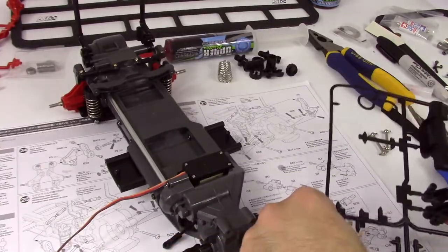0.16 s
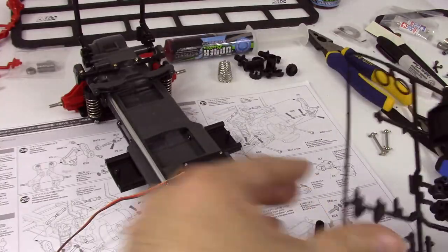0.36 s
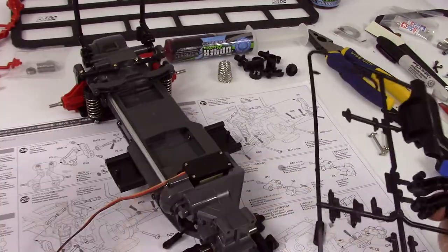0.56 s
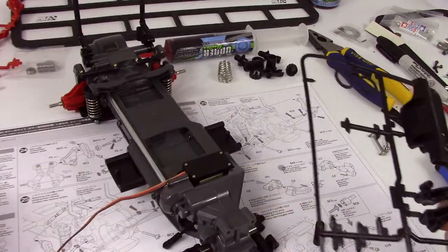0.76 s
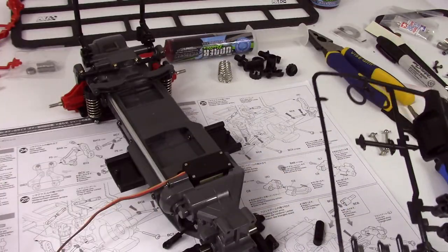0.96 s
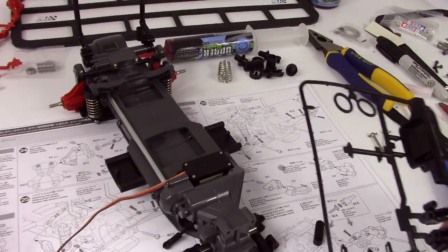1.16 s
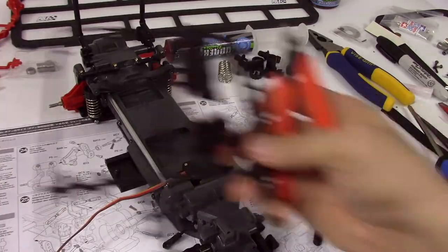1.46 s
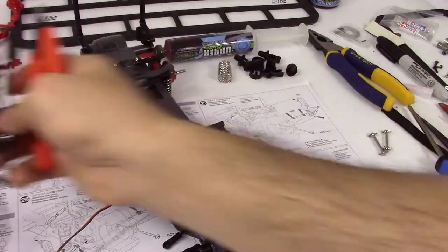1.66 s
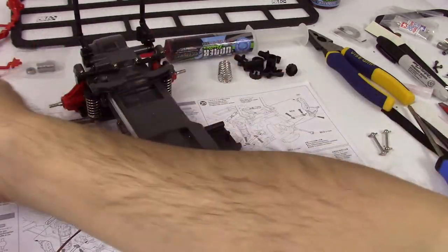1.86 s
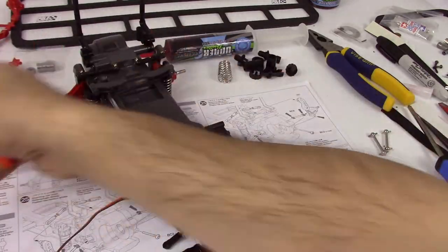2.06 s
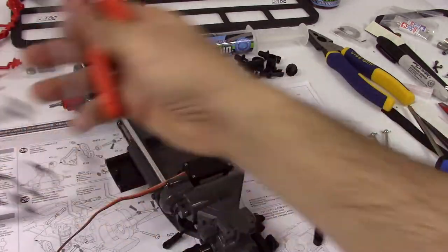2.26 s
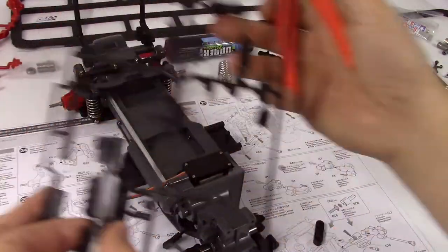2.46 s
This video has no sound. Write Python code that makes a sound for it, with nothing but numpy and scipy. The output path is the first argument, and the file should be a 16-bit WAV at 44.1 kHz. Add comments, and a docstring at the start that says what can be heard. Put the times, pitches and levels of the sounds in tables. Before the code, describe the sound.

Close, muffled shirt rustle with sharp little plastic clicks, a brief quieter moment, then strong low thumps and louder rubbing, a short rattling drop of thin plastic, and more cloth rustle in a quiet room with faint hiss.

```python
"""At a hobby table, a clip-on microphone rubs on the shirt of its wearer, who reaches across.
Cloth rustles as three bands of patchy noise; rounded pushes and slipping tugs move the capsule.
Thin plastic sprues tick as short rings, scrape as dense grains, squeak as gliding tones and knock as ringing modes.
One frame is dropped on a pile of others and rattles out; the room answers under a steady faint hiss."""
import sys
import numpy as np
from scipy import signal
from scipy.fft import rfft, irfft, next_fast_len
from scipy.io import wavfile
from scipy.ndimage import uniform_filter1d, map_coordinates

SR = 44100
rng = np.random.default_rng(int(sys.argv[2]) if len(sys.argv) > 2 else 0)


def elevation(decibels):
    """Turn decibel levels (scalar or array-like) into linear amplitude ratios."""
    levels = np.asarray(decibels, float)
    return 10 ** (levels / 20)


def file_out(sig):
    """Save sig as 16-bit WAV at sys.argv[1]."""
    # one column per channel
    cols = np.atleast_2d(sig).T
    # limit, then scale
    lim = np.clip(cols, -1, 1)
    pcm = np.round(lim * 32767).astype(np.int16)
    wavfile.write(sys.argv[1], SR, pcm)


N = 114660  # length in samples


def unit(x):
    """Scales a sound to rms 1."""
    return x / np.sqrt(np.mean(x ** 2) + 1e-20)


def along(points, hz):
    """Reads a curve of (Hz, value) points on a log frequency axis."""
    point_hz, value = np.transpose(points)
    return np.interp(np.log(hz + 1), np.log(point_hz + 1), value)


def wobble(rate):
    """A smooth random curve through rate knots a second."""
    knots = rng.standard_normal(int(N * rate / SR) + 4)
    return map_coordinates(knots, [np.arange(N) * rate / SR])


def filtered(x, response):
    """Shapes the spectrum of x by a function of frequency."""
    size = next_fast_len(len(x) + 8192)
    hz = np.fft.rfftfreq(size, 1 / SR)
    return irfft(rfft(x, size) * response(hz), size)[:len(x)]


def add(track, start_s, sound):
    """Mixes a sound into the track from start_s, cut at the track's end."""
    part = track[round(start_s * SR):][:len(sound)]
    part += sound[:len(part)]


# steady hiss of room and microphone, spectrum shape: pitch_hz [Hz], density_db [dB per Hz]
FLOOR_SPECTRUM = [(100, -9), (1000, 20), (4000, -4), (9000, -4), (13000, -26), (16000, -1)]
FLOOR_DB = -70.5  # rms


def noise_floor():
    """Steady noise coloured by one fixed spectrum."""
    noise = rng.standard_normal(N)
    return elevation(FLOOR_DB) * unit(filtered(noise, lambda hz: elevation(along(FLOOR_SPECTRUM, hz))))


# how long the room rings at each pitch: pitch_hz [Hz], t60_s [s]
ROOM_DECAY = [(200, 0.21), (2000, 0.16), (10000, 0.18)]
ROOM_DB = -12


def room(x):
    """The room's answer is a burst of noise in which each frequency dies at its own speed."""
    hz, t, z = signal.stft(rng.standard_normal(SR // 2), SR, nperseg=256)
    decay = elevation(-60 * t / along(ROOM_DECAY, hz)[:, None])
    tail = signal.istft(z * decay, SR, nperseg=256)[1]
    late = np.pad(x, (200, 0))  # the answer starts 200 samples after the sound
    return elevation(ROOM_DB) * signal.fftconvolve(late, tail / np.linalg.norm(tail))[:N]


def rush(spectrum, patchy_db, grain_db, grain_rate):
    """Coloured noise of rms 1, mottled in time and pitch, with a fine grain in its level."""
    z = signal.stft(rng.standard_normal(N), nperseg=512)[2]
    patches = uniform_filter1d(rng.standard_normal(z.shape), 8, 0)
    patches = uniform_filter1d(patches, 8, 1)
    noise = signal.istft(z * elevation(patchy_db * unit(patches)), nperseg=512)[1][:N]
    grainy = noise * elevation(grain_db * wobble(grain_rate))
    return unit(filtered(grainy, lambda hz: elevation(along(spectrum, hz))))


# spectrum shapes of the three cloth layers: pitch_hz [Hz], density_db [dB per Hz]
RUMBLE_SPECTRUM = [(4, -16), (11, 8.5), (22, -2.5), (38, 0.5), (55, -8), (85, -18), (130, -25), (250, -46)]
RUB_SPECTRUM = [(60, 3), (120, 1.5), (250, -1), (500, 1), (800, -4), (1300, -6), (2000, -14.5), (3000, -23),
                (5000, -37)]
HISS_SPECTRUM = [(1000, -10), (2000, -4), (2800, -2.5), (3800, 3), (5000, -3), (6500, -3.5), (8500, -6),
                 (11000, -11.5), (13500, -45), (16000, -12)]
# cloth moving on the microphone, levels glide between rows:
# time_s [s], rumble_db [dB], rub_db [dB], hiss_db [dB]
CLOTH_MOVES = [(0, -38.5, -39.5, -46.5), (.1, -43, -44.5, -46), (.145, -37.5, -49, -59.5),
               (.2, -34, -40.5, -50), (.27, -48.5, -39, -47), (.35, -37.5, -44, -52.5),
               (.46, -40, -50.5, -49.5), (.52, -35, -42, -48.5), (.6, -37.5, -37.5, -46),
               (.72, -39.5, -37, -48), (.85, -43.5, -37, -50.5), (.91, -38, -42.5, -54.5),
               (.99, -44, -53, -59.5), (1.09, -46, -51, -57), (1.27, -44.5, -47, -57),
               (1.34, -44, -42, -51), (1.44, -46, -35.5, -47.5), (1.55, -35, -35, -42),
               (1.67, -25.5, -32, -40), (1.73, -30, -32, -40.5), (1.78, -34, -37.5, -42.5),
               (1.88, -37, -35, -44.5), (1.93, -41, -42.5, -54), (2.11, -33.5, -36, -45.5),
               (2.25, -40.5, -35, -46.5), (2.42, -38.5, -38, -49), (2.6, -45, -35, -48.5)]


def cloth():
    """Fabric dragging on the microphone: rumble, rub and hiss; one flutter ties rub and hiss together."""
    time_s, *levels = np.transpose(CLOTH_MOVES)
    rumble_db, rub_db, hiss_db = [np.interp(np.arange(N) / SR, time_s, level) for level in levels]
    flutter = wobble(35.274)
    rumble = rush(RUMBLE_SPECTRUM, patchy_db=-0.3, grain_db=1.4, grain_rate=29)
    rub = rush(RUB_SPECTRUM, patchy_db=0.52, grain_db=-0.5, grain_rate=260)
    hiss = rush(HISS_SPECTRUM, patchy_db=0.56, grain_db=0.5, grain_rate=400)
    return (elevation(rumble_db + 0.5 * wobble(10.57)) * rumble
            + elevation(rub_db + 1.56 * flutter) * rub
            + elevation(hiss_db + 0.32 * flutter) * hiss)


# soft bumps on the capsule: peak_s [s], level_db [dB], pitch_hz [Hz], direction [signed gain]
CAPSULE_BUMPS = [(0.1762, -29.5, 410, 1), (0.2772, -17.5, 152, -0.85), (.298, -43, 92, 0.88),
                 (0.3101, -27.5, 250, 0.83), (0.344, -21.5, 182, -0.92), (0.698, -24, 9.3, 0.65),
                 (0.838, -36, 20, 0.64), (.895, -34.5, 52, 1), (1.190, -28.5, 240, -0.67),
                 (1.244, -25.5, 270, 0.5), (1.415, -18, 34, 0.84), (1.4898, -15, 360, -0.83),
                 (1.5812, -19, 400, -0.88), (1.606, -23, 48, -0.91), (1.639, -21, 82, 1),
                 (1.650, -18, 36, -0.65), (1.6637, -10.5, 155, -0.75), (1.682, -11, 48, 0.49),
                 (1.714, -16, 23, -0.38), (1.761, -29, 92, 0.76), (1.778, -30, 165, -1.5),
                 (2.2888, -19.5, 430, -0.81), (2.302, -44, 360, -1)]
EDGE_RATIO, EDGE_DB = 2.07, -12.5  # sharper tip of a bump: pitch ratio, level against the push


def bumps():
    """Each bump is one rounded push with a dip on either side and a smaller, sharper tip."""
    out, t = np.zeros(N), np.arange(-SR // 20, SR // 8) / SR
    for peak_s, level_db, pitch_hz, direction in CAPSULE_BUMPS:
        for ratio, gain_db in (1, level_db), (EDGE_RATIO, level_db + EDGE_DB):
            u = (np.pi * pitch_hz * ratio * t) ** 2
            add(out, peak_s + t[0], direction * elevation(gain_db) * (1 - 2 * u) * np.exp(-u))
    return out


# tugs of the cloth on the capsule: slip_s [s], level_db [dB], swing_hz [Hz]
CAPSULE_TUGS = [(1.4877, -15, 19), (1.5851, -15, 31), (2.2863, -18.5, 24)]
TIGHTEN_S, SLIP_S, SWING_T60_S = 0.0019, 0.00081, 0.143


def tugs():
    """Cloth tightens and pulls the capsule one way, then slips; the capsule swings back and settles."""
    out, t = np.zeros(N), np.arange(-SR // 20, SR // 8) / SR
    slipped = (1 + np.tanh(t / SLIP_S)) / 2  # 0 while held, 1 once free
    pull = (1 - slipped) * np.exp(-np.abs(t) / TIGHTEN_S)
    for slip_s, level_db, swing_hz in CAPSULE_TUGS:
        swing = np.cos(2 * np.pi * swing_hz * t) * elevation(-60 * np.abs(t) / SWING_T60_S)
        add(out, slip_s + t[0], elevation(level_db) * (slipped * swing - pull))
    return out


# dry ticks of thin plastic: start_s [s], level_db [dB], pitch_hz [Hz]
PLASTIC_TICKS = [(.153, -33, 9900), (.158, -52, 9000), (.1675, -41, 11550), (0.1736, -33.5, 4560),
                 (0.1748, -32, 10300), (.180, -35, 11000), (.413, -26.5, 8100), (.587, -30, 8800),
                 (.665, -29, 12100), (.682, -15, 8100), (.892, -39, 10000), (.915, -38, 8000),
                 (0.9197, -27, 8300), (0.9217, -20.5, 10500), (0.9247, -20, 8300), (.9247, -24, 11000),
                 (0.9467, -27, 7600), (.966, -40, 10000), (.969, -43, 12000), (.985, -41, 5200),
                 (1.026, -31.5, 10000), (1.1703, -34, 6560), (1.6142, -17.5, 7800)]
TICK_CYCLES, TICK_RISE_CYCLES = 6.5, 1.5  # cycles to fall by 30 dB, cycles of rise
OVERTONE_RATIO, OVERTONE_DB = 1.4, -9
FIZZ_DB, FIZZ_T60_S = -28, 0.025


def ticks():
    """Thin plastic rings for a few cycles with an overtone, over a faint dying fizz."""
    out, t = np.zeros(N), np.arange(SR // 50) / SR
    for start_s, level_db, pitch_hz in PLASTIC_TICKS:
        noise = np.diff(rng.standard_normal(len(t) + 2), 2) / 2  # differencing favours the treble
        fizz = elevation(FIZZ_DB - 60 * t / FIZZ_T60_S) * noise
        rise = 1 - np.exp(-(t * pitch_hz / TICK_RISE_CYCLES) ** 2)
        life = elevation(-30 * t * pitch_hz / TICK_CYCLES) * rise
        ring = np.sin(2 * np.pi * pitch_hz * t)
        overtone = np.sin(2 * np.pi * pitch_hz * OVERTONE_RATIO * t + rng.uniform(0, 8.3))
        ring = ring + elevation(OVERTONE_DB) * overtone
        add(out, start_s, elevation(level_db) * (ring * life / life.max() + fizz))
    return out


# short squeaks of plastic: start_s [s], length_s [s], level_db [dB], pitch_hz [Hz] at the start
PLASTIC_SQUEAKS = [(.283, 0.0079, -41, 5440), (.862, .012, -36, 3950), (1.104, .022, -46.5, 6570),
                   (1.8, .013, -37, 8600), (1.132, 0.02, -54, 6400), (1.3, 0.028, -65, 6200),
                   (1.176, 0.015, -55, 5500)]


def squeaks():
    """A thin tone swells and fades while its pitch glides up a little and jitters."""
    out, t = np.zeros(N), np.arange(SR // 8) / SR
    for start_s, length_s, level_db, pitch_hz in PLASTIC_SQUEAKS:
        u = np.clip(t / length_s, 0, 1)
        jitter = np.cumsum(0.12 * rng.standard_normal(len(t)))  # radians
        tone = np.sin(2 * np.pi * pitch_hz * t * (1 + 0.022 * u) + jitter)
        add(out, start_s, elevation(level_db) * np.sin(np.pi * u) * tone)
    return out


def tilt_db(hz, slope):
    """Brightness pivoting at 2 kHz in dB per octave of (hz + 700), with plastic dulling above 12.4 kHz."""
    return slope * np.log2((hz + 700) / 2700) - 10 * np.log10(1 + (hz / 12400) ** 4)


# ringing modes of a sprue frame: pitch_hz [Hz], level_db [dB], t60_s [s]; knocks play them too
FRAME_MODES = [(406, -4.5, 0.071), (590, -2, 0.042), (678, -2.5, 0.047), (785, 0.5, 0.043),
               (857, -8.5, 0.056), (1000, -5, 0.041), (1180, -1.5, 0.024), (1400, -7.5, 0.037),
               (1590, -8, 0.013), (1987, -2, 0.055), (2720, -11, 0.047), (2942, -5, 0.052),
               (3535, -4, 0.04), (3837, 2, 0.021), (4090, 0, 0.02), (5250, -5.5, 0.034), (6010, -9, 0.054),
               (6920, -6.5, 0.091), (8300, -10.5, 0.059), (11000, -12, 0.018)]
SCRAPE_WIDEN = 13  # modes are this much broader while frames rub


def rubbed_frame(hz):
    """Response of a frame held in contact: its modes as heavily damped resonances of alternating sign."""
    total = 0
    for k, (mode_hz, level_db, t60_s) in enumerate(FRAME_MODES):
        damping = 1j * hz * SCRAPE_WIDEN * 2 / t60_s
        total = total + elevation(level_db) * damping / (mode_hz * mode_hz - hz * hz + damping) * (-1) ** k
    return total


# frames sliding on each other: start_s [s], length_s [s], level_db [dB], slope [dB per octave]
FRAME_SCRAPES = [(0.222, 0.059, -50.5, 8), (0.28, 0.017, -47, 3), (0.852, 0.024, -44, -1.5),
                 (1.05, 0.017, -47.5, -3.5), (1.106, 0.023, -52, 1), (1.167, 0.03, -47, 3),
                 (1.9489, 0.055, -26, 0), (1.981, 0.027, -30, 0), (2.007, 0.0706, -38, -3.5),
                 (2.057, 0.011, -40, 4)]
SCRAPE_RISE_S, SCRAPE_FALL_S = 0.00084, 0.0057
GRAINS_PER_S, GRAIN_SPREAD_DB = 4600, 3


def scrapes():
    """Sliding edges catch in dense uneven grains that excite the blurred modes of the frame."""
    out, t = np.zeros(N), np.arange(SR // 8) / SR
    for start_s, length_s, level_db, slope in FRAME_SCRAPES:
        chance, strength = rng.random((2, len(t)))
        hits = chance < GRAINS_PER_S / SR
        grains = hits * elevation(GRAIN_SPREAD_DB * strength) * rng.choice([-1, 1], len(t))
        fall = np.exp(-np.maximum(t - length_s, 0) / SCRAPE_FALL_S)
        stroke = (1 - np.exp(-t / SCRAPE_RISE_S)) * fall
        # a little of each grain passes without the modes
        rasp = unit(filtered(grains, lambda hz: (rubbed_frame(hz) + 0.1) * elevation(tilt_db(hz, slope))))
        add(out, start_s, elevation(level_db) * stroke * rasp)
    return out


# knocks on a frame, with the drop and its rattle: start_s [s], level_db [dB], favoured_hz [Hz]
FRAME_KNOCKS = [(.153, -44.5, 3570), (.1745, -43.5, 2600), (.1795, -38, 3250), (0.255, -42, 1300),
                (.966, -47, 4800), (1.0525, -38, 3870), (1.056, -45, 1800), (1.1268, -33, 1050),
                (1.130, -37.5, 1400), (1.135, -38, 1000), (1.1706, -45.5, 2200), (1.189, -37, 447),
                (1.949, -25, 10500), (1.954, -25.5, 4540), (1.960, -28, 3900), (1.972, -25, 2800),
                (1.9783, -15.5, 3700), (1.9812, -19.5, 800), (1.9835, -23, 2480), (1.9915, -23, 700),
                (1.991, -30, 5500), (1.996, -33, 3000), (2.002, -22.5, 600), (2.010, -30, 3500),
                (2.014, -22.5, 430), (2.021, -41, 5000), (2.045, -36, 3500), (2.060, -39, 9000),
                (2.064, -32.5, 3680)]
FAVOUR_OCTAVES, FAVOUR_DB = 0.57, 16  # width of the favoured range, its height over the rest
CRACK_DB, CRACK_T60_S = 2.5, 0.036


def knocks():
    """Each knock rings the frame's modes anew, most near the pitch it favours, with a noisy crack."""
    out, t = np.zeros(N), np.arange(SR // 8) / SR
    for start_s, level_db, favoured_hz in FRAME_KNOCKS:
        def favour_db(hz):
            """Level against pitch: a hump at the favoured pitch."""
            octaves = np.log2((hz + 1) / favoured_hz)
            return FAVOUR_DB * (np.exp(-(octaves / FAVOUR_OCTAVES) ** 2) - 1) + tilt_db(hz, 0)

        ring = np.zeros(len(t))
        for mode_hz, mode_db, t60_s in FRAME_MODES:
            struck_db = mode_db + favour_db(mode_hz) + rng.normal(0, 4.9)
            struck_hz = mode_hz * rng.normal(1, 0.0064)
            tone = np.sin(2 * np.pi * struck_hz * t + rng.uniform(0, 3.3))
            ring += elevation(struck_db - 60 * t / t60_s) * tone
        burst = elevation(CRACK_DB - 60 * t / CRACK_T60_S) * rng.standard_normal(len(t))
        crack = filtered(burst, lambda hz: elevation(favour_db(hz)) * (hz > 250))
        attack = 1 - np.exp(-t / 0.0001)
        add(out, start_s, elevation(level_db) * (ring + crack) * attack)
    return out


def scene():
    """Knocks, scrapes and squeaks sound in the room; ticks stay dry; cloth acts on the microphone directly."""
    plastic = knocks() + scrapes() + squeaks()
    handling = cloth() + bumps() + tugs()
    mix = noise_floor() + room(plastic) + handling + ticks() + plastic
    return mix[None]


def band_limit(x):
    """A steep low-pass at the top of the band."""
    return signal.sosfilt(signal.butter(12, 16500, fs=SR, output="sos"), x)


MIC_RESPONSE = [(1000, 0.5), (12000, -1), (14000, -2), (15700, -9.5), (15900, -24), (17000, -30)]


def record(dry):
    """The microphone colours the mix: nearly flat, with a steep fall at the top."""
    finished = filtered(dry[0], lambda hz: elevation(along(MIC_RESPONSE, hz)))[None]
    return band_limit(finished)


dry = scene()
out = record(dry)
file_out(out)
```